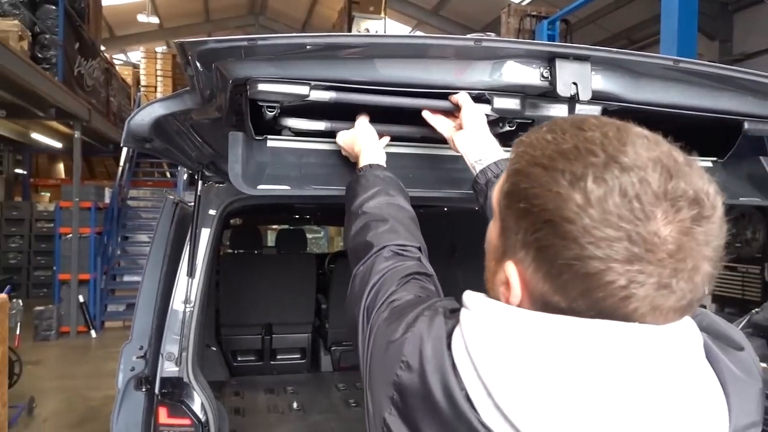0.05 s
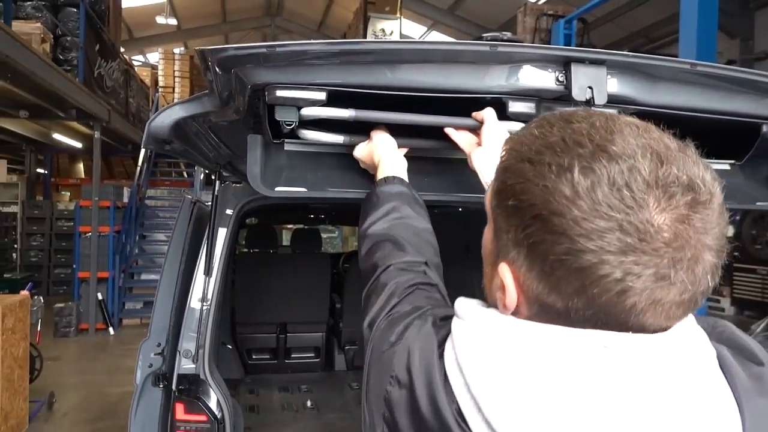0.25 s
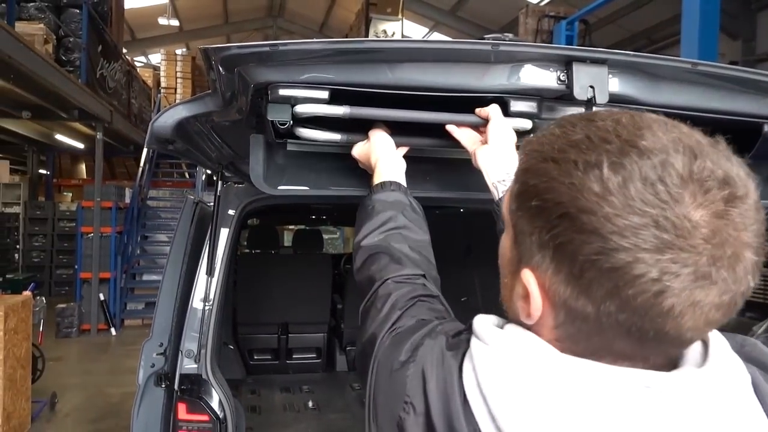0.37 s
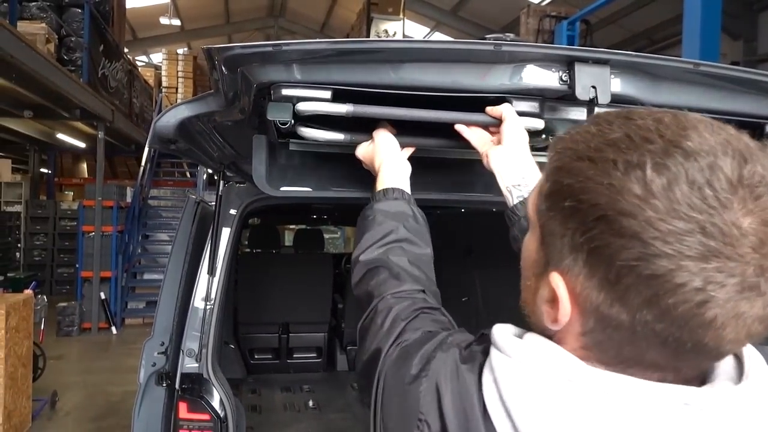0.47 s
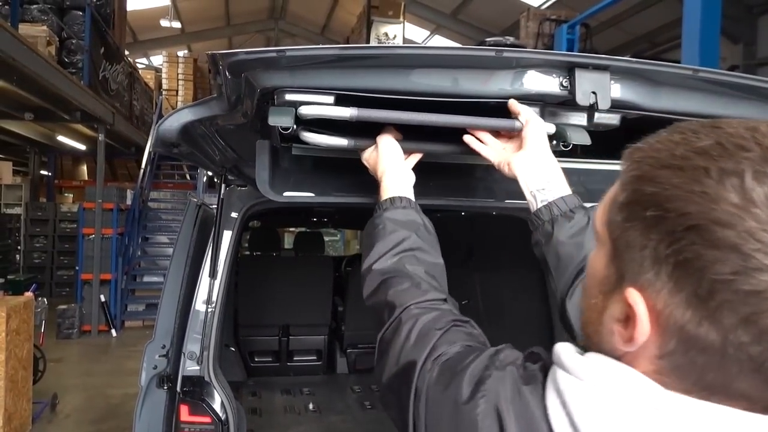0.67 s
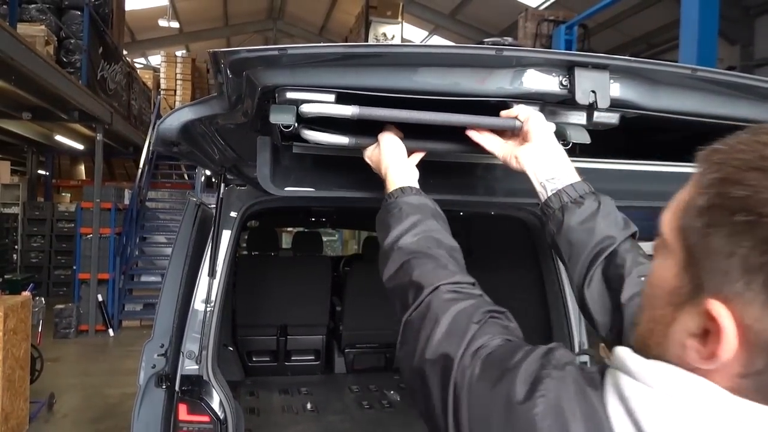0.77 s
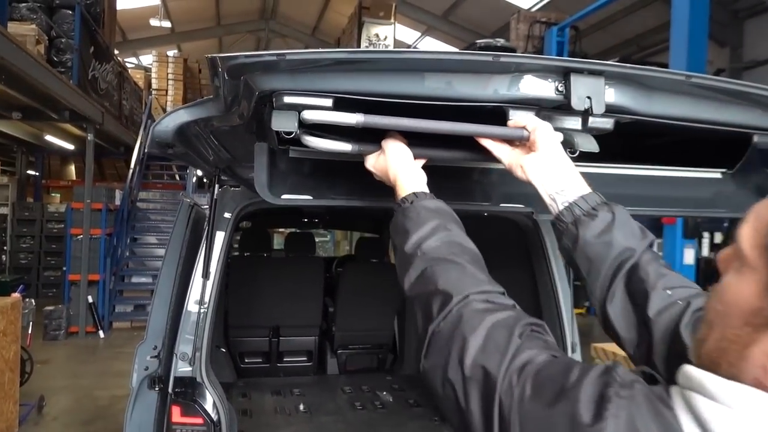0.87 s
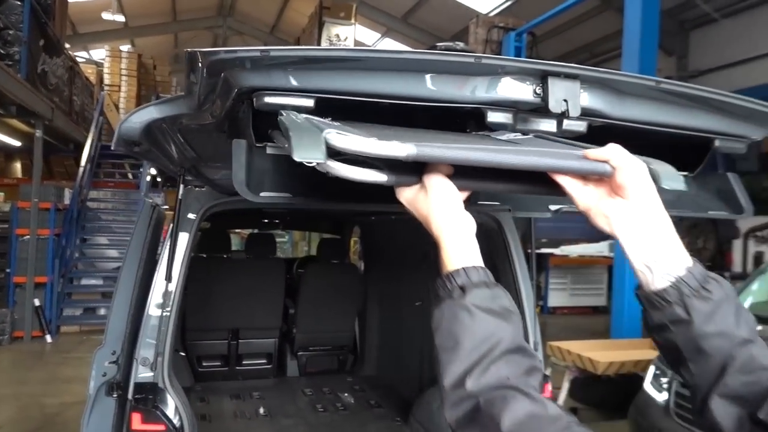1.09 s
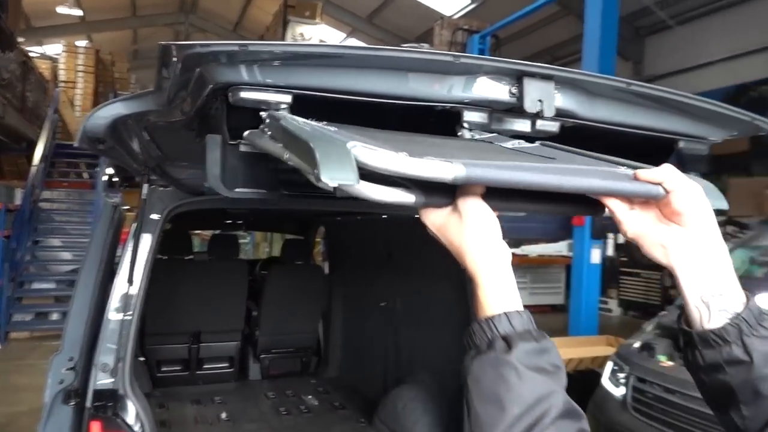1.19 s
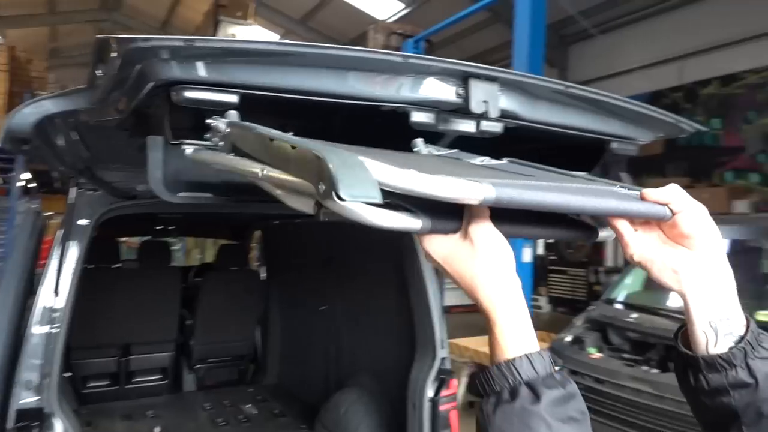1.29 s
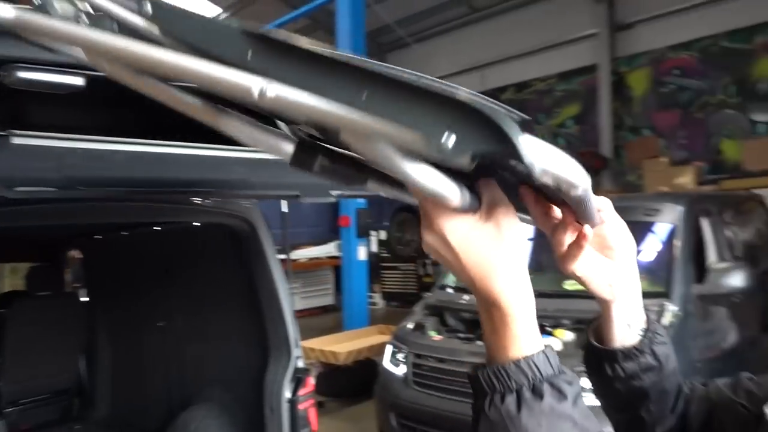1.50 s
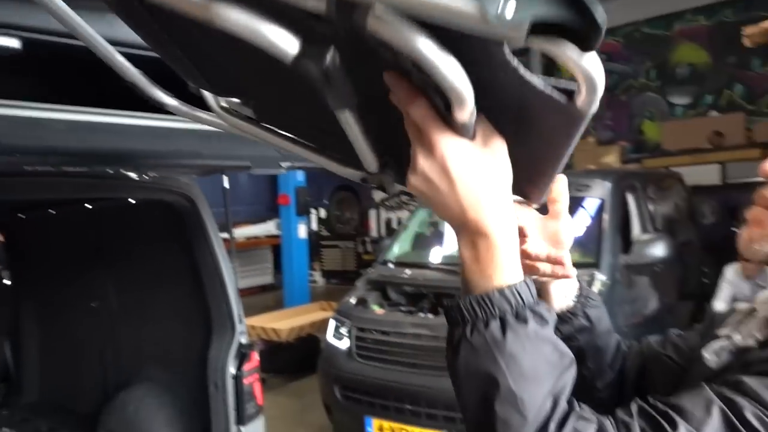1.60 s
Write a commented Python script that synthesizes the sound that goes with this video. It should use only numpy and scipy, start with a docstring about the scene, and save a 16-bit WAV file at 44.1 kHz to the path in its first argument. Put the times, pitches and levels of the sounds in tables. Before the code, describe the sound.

Close, hollow clunks and scrapes come from a folding chair being tugged out of a plastic tailgate compartment. Two groaning pulls lead to a rumbling drag, brief squeaks and a clank, then faint sleeve rustle in a quiet, slightly echoing workshop.

```python
"""A folded camping chair is worked out of a plastic pod on a van's raised tailgate, in a quiet workshop.
First the seat fabric hisses, the chair knocks loose, fittings tick and the tailgate booms from the shove.
Stick-slip friction then makes the pod judder in two pulls, with a nudge and a swish of sleeves between.
Next the tube frame drags over the pod's lip, squeaks and clanks as it comes free.
Last come a very faint, thin whistle and a rustle of sleeves, while the hall's reverberation dies away."""
import sys
import numpy as np
from scipy import signal
from scipy.io import wavfile
from scipy.ndimage import uniform_filter1d

SR = 44100
rng = np.random.default_rng(int(sys.argv[2]) if len(sys.argv) > 2 else 0)


def persist_wave(psi):
    """Save psi, clipped to +-1, as 16-bit WAV."""
    counts = np.round(np.clip(psi, -1, 1) * 32767).astype(np.int16)
    wavfile.write(sys.argv[1], SR, np.atleast_2d(counts).T)


N = 72765
T = np.arange(N) / SR
EDGES = np.geomspace(24, 17000, 23)  # band edges [Hz]
CENTRES = np.sqrt(EDGES[1:] * EDGES[:-1])


def from_db(db):
    """Amplitude grows tenfold for every 20 dB."""
    return 10 ** (np.asarray(db) / 20)


def rms_one(x):
    """Division by the RMS value gives unit power."""
    return x / np.sqrt(np.mean(x ** 2) + 1e-20)


def at_hz(points, hz, column=1):
    """Interpolation of a table column on a log-frequency axis."""
    points = np.array(points)
    return np.interp(np.log(hz), np.log(points[:, 0]), points[:, column])


def level(points, fade_s=0.014):
    """Amplitude envelope along a decibel curve, fading to silence outside it."""
    s, db = np.transpose(points)
    gate = np.interp(T, [s[0] - fade_s, s[0], s[-1], s[-1] + fade_s], [0, 1, 1, 0])
    return from_db(np.interp(T, s, db)) * gate


def bands(pair):
    """A filter bank splits two uncorrelated signals into alternating bands of unit power."""
    filters = [signal.butter(2, edges, "band", fs=SR, output="sos") for edges in zip(EDGES, EDGES[1:])]
    return np.array([rms_one(signal.sosfilt(sos, pair[k % 2])[-N:]) for k, sos in enumerate(filters)])


def noise_bands():
    """Band-limited Gaussian noise, one row a band."""
    return bands(rng.standard_normal((2, N + SR // 4)))


def band_gains(spectrum):
    """Band power is spectral density times bandwidth; the gains give unit total power."""
    gains = from_db(at_hz(spectrum, CENTRES)) * np.sqrt(np.diff(EDGES))
    return gains / np.linalg.norm(gains)


def clicks_at(s, gains):
    """Ideal impacts: impulses one sample long."""
    return np.bincount((np.abs(s) * SR).astype(int), gains, N)[:N]


def ring(clicks, hz, t60):
    """A damped mode answers each impulse with a decaying sine of that height."""
    r, w = from_db(-60 / (max(t60, 1e-3) * SR)), 2 * np.pi * hz / SR
    return signal.lfilter([0, np.sin(w)], [1, -2 * r * np.cos(w), r * r], clicks + 1e-18)


def dying(power, t60):
    """Stored energy decays exponentially after each impulse."""
    return signal.lfilter([1], [1, -np.exp(-2 * np.log(1000) / (t60 * SR))], power + 1e-18)


def resonate(x, hz, width_hz):
    """A driven resonator with unit gain at its peak."""
    r, w = np.exp(-np.pi * width_hz / SR), 2 * np.pi * hz / SR
    return signal.lfilter(np.array([1, 0, -1]) * (1 - r * r) / 2, [1, -2 * r * np.cos(w), r * r], x + 1e-18)


def gliding(x, hz, width_hz):
    """A driven resonator with a moving natural frequency and unit peak gain."""
    turn = np.exp(2j * np.pi * np.cumsum(hz) / SR)
    r = np.exp(-np.pi * width_hz / SR)
    return 2 * np.real(turn * signal.lfilter([1 - r], [1, -r], x / turn + 1e-18))


def wobble(size):
    """Noise averaged twice over `size` samples fluctuates smoothly, with unit power."""
    return rms_one(uniform_filter1d(uniform_filter1d(rng.standard_normal(N), size), size))


def air():
    """Ambient noise: the workshop's steady background, strongest in the bass."""
    # (frequency [Hz], relative spectral density [dB])
    spectrum = [(30, -0.5), (60, -7), (105, -1), (180, -12.5), (420, -10.5), (900, -22), (2000, -27.5),
                (4500, -38.5), (9000, -41), (15000, -50)]
    return from_db(-50.5) * (band_gains(spectrum) @ noise_bands())


def tailgate():
    """Panel vibration: two low modes of the thin tailgate skin swell and decay after each shove."""
    # shoves: (time [s], peak level [dB])
    booms = [(.01, -50), (0.314, -20.5), (0.491, -35), (.655, -39), (1.11, -27.5), (1.335, -33)]
    swell_s, fall_s = 0.049, 0.045
    mode_hz, overtone_hz, overtone_db = 106.7, 154.6, -24
    envelope = 0
    for s, db in booms:
        age = np.maximum(T - s, 0)
        swell = (1 - np.exp(-(age / swell_s) ** 2)) * np.exp(-age / fall_s)
        envelope += from_db(db) * swell / swell.max()
    overtone = from_db(overtone_db) * np.sin(2 * np.pi * overtone_hz * T)
    return envelope * (np.sin(2 * np.pi * mode_hz * T) + overtone)


def cloth(spectrum, rough_db):
    """Friction noise of woven threads; random amplitude modulation gives it a fine grain."""
    grain = rms_one(uniform_filter1d(rng.standard_normal(N), size=90))
    return rms_one((band_gains(spectrum) @ noise_bands()) * from_db(rough_db * grain))


def seat():
    """Sliding friction: the seat fabric hisses over the pod."""
    # envelope of the slide: (time [s], level [dB])
    slide = [(.2, -57.5), (.48, -48), (.52, -39.5), (.66, -48), (.89, -51), (.95, -40), (1.04, -34.5),
             (1.13, -32), (1.2, -39.5), (1.27, -47), (1.48, -51)]
    # hiss: (frequency [Hz], relative spectral density [dB])
    spectrum = [(400, 5), (900, 6), (1500, 2.5), (2200, 0.5), (3200, -12.5), (4800, -17.5), (8000, -22.5),
                (11000, -38), (15000, -35)]
    return level(slide) * cloth(spectrum, rough_db=1.0)


def knocks():
    """Impact excitation: a knock cracks and rings the pod's dense modes, the struck spot and the frame."""
    # chair on pod: (time [s], level [dB], bass offset [dB], treble offset [dB], frame offset [dB],
    # note of the struck spot [Hz], note offset [dB])
    impacts = [(0.213, -41, 3, -18, -22, 330, 0), (0.2234, -30, 0, -27, -12, 475, 8),
               (0.26, -28, -2, -29, -26, 244, 7.5), (0.266, -30, 8, -1.5, -17, 373, 6.5),
               (0.290, -17, -6, 0, -24, 760, -4), (0.298, -23, 7, -30, -3, 466, 11),
               (0.315, -22, 11, -6, -27, 251, 5.5), (0.3235, -26, 0, 12.5, -3, 450, 1),
               (0.331, -20, -6, 1.5, -21, 422, 9), (0.352, -26, 6, 4.5, -5, 380, 7),
               (0.364, -17.5, -7, -15, -22, 295, 6.5), (0.383, -26, -5, -20, -14, 401, 8),
               (0.398, -29.5, 2, -8, -16, 680, 1.5), (0.417, -30, 0, -7, -10, 484, 3),
               (0.466, -38, 7, -14, -8, 349, 11), (0.499, -43.5, 11, 17, -4.5, 473, 2),
               (0.517, -29, 13, -6, -18, 594, 7), (0.642, -37.5, -11, -22, -3, 354, 14),
               (0.897, -33, 3.5, -11, -13, 423, 4), (1.072, -23.5, 4.5, -37, -7, 368, 4.5),
               (1.1425, -19, 2, -19, -5, 151, 0), (1.174, -31.5, 19, -22, -22, 160, 10),
               (1.19, -29.5, 13, -10, -22, 292, 8.5), (1.2093, -18, 3, -6, -2.5, 216, -2),
               (1.218, -23, 3, -23, -15, 162, 8.5), (1.227, -31, 13, -13, 1, 536, 3),
               (1.2746, -19.5, -20, 9, -19, 1314, 3), (1.28, -19.5, 3, 6, -3, 1158, 10),
               (1.286, -25, -10, 9.5, -5, 564, 4), (1.302, -23.5, 0, -28, -2, 649, 5),
               (1.32, -26, -6, -7, -7, 415.5, 8)]
    # the pod's dense modes: (frequency [Hz], relative spectral density [dB])
    pod_spectrum = [(35, -15), (70, -25.5), (140, -3), (330, -0.5), (650, 0), (1050, -6), (1600, -14),
                    (2700, -20.5), (4200, -38.5), (7500, -44), (15000, -51)]
    # their damping: (frequency [Hz], t60 [s])
    pod_t60 = [(60, 0.29), (350, 0.22), (1500, 0.16), (5000, 0.14), (14000, 0.036)]
    # attack, slower in the bass: (frequency [Hz], rise time [s])
    rise_times = [(100, 0.0059), (1000, 0.0011), (6000, 0.0008)]
    # modes of the tube frame: (frequency [Hz], relative level [dB], t60 [s])
    frame_modes = [(347.8, -7.5, 0.33), (467.4, -2.5, 0.43), (678, 2.5, 0.071), (964, -4, 0.18),
                   (1135, -8, 0.094), (1252, -1, 0.11), (1426, -3, 0.12), (1944, -6.5, 0.055),
                   (2277, -13, 0.19), (2410, -23, 0.11)]
    bass_hz, middle_hz, treble_hz = 120, 520, 3700
    crack_db, crack_t60_s, frame_db = 4.5, 0.017, -4.5
    s, db, bass_db, treble_db, ring_db, note_hz, note_db = np.transpose(impacts)
    out = 0
    for hz, noise, gain in zip(CENTRES, noise_bands(), band_gains(pod_spectrum)):
        bass = at_hz([(bass_hz, 1), (middle_hz, 0)], hz)
        treble = at_hz([(middle_hz, 0), (treble_hz, 1)], hz)
        blows = clicks_at(s, from_db(db + bass * bass_db + treble * treble_db) ** 2)
        crack = from_db(crack_db) ** 2 * dying(blows, crack_t60_s)
        power = dying(blows, at_hz(pod_t60, hz)) + crack
        rise = np.exp(-1 / (at_hz(rise_times, hz) * SR))
        out += gain * noise * np.sqrt(signal.lfilter([1 - rise], [1, -rise], power))
    for start, hit_db, hz in zip(s, db + note_db, note_hz):
        out += ring(clicks_at([start], [from_db(hit_db)]), hz, t60=0.086)
    for hz, mode_db, t60 in frame_modes:
        strengths = from_db(frame_db + db + ring_db + mode_db + rng.normal(0, 1.5, len(s)))
        out += ring(clicks_at(s, strengths), hz, t60) * rng.choice([-1, 1])
    return out


def ticks():
    """Resonant filtering: each brief scratch excites one broad resonance of a small hard fitting."""
    # (time [s], level [dB], resonance [Hz])
    scratches = [(.224, -56, 6450), (0.258, -50, 5400), (0.264, -54, 8000), (0.295, -39, 7900),
                 (0.3206, -44, 6200), (0.328, -42, 5500), (0.351, -43.5, 6100), (.399, -55.5, 10900),
                 (0.498, -52, 5540), (.897, -48, 905), (0.896, -58.5, 1990), (1.163, -51.5, 7600),
                 (1.21, -43.5, 6730), (1.279, -31, 4480)]
    width_hz, t60_s = 800, 0.046
    make_up = np.sqrt(SR / (np.pi * width_hz))  # restores the power lost in filtering
    out = 0
    for s, db, hz in scratches:
        envelope = (T >= s) * from_db(-60 * np.clip((T - s) / t60_s, 0, 3))
        out += from_db(db) * make_up * resonate(rng.standard_normal(N) * envelope, hz, width_hz)
    return out


def stick_slip(force, spot):
    """Stick-slip friction: uneven slips and grit drive the pod wall into a hollow, rising groan."""
    slips_per_s, jitter, spread_db, grit = 180, 0.42, 3, 0.64
    flat_share, settle_s, handover_db_per_s, dull_hz = 0.13, 0.017, 172, 1710
    gap_draws, size_draws = rng.standard_normal((900, 2)).T
    slip_times = np.cumsum(np.exp(jitter * gap_draws)) / slips_per_s
    slips = clicks_at(slip_times, from_db(spread_db * np.tanh(size_draws)))
    drive = rms_one(rms_one(slips) + grit * rng.standard_normal(N)) * level(force)
    # the resonances start flat and rise as the contact is loaded
    bend = 1 - flat_share * np.exp(-np.maximum(T - force[0][0], 0) / settle_s)
    hz, width, db, peak_s = np.transpose(spot)
    # each fades as the contact slides away from it; together they keep the drive's power
    shares = from_db(db[:, None] - handover_db_per_s * np.abs(T - peak_s[:, None]))
    shares /= np.sqrt(np.pi * width / SR @ shares ** 2)
    wall = sum((-1) ** k * gliding(drive * share, hz[k] * bend, width[k])
               for k, share in enumerate(shares))
    return signal.sosfilt(signal.butter(2, dull_hz, fs=SR, output="sos"), wall)


def judders():
    """The contact point selects the modes: two pulls and a nudge between each rub a different spot."""
    # friction force: (time [s], level [dB])
    first_pull = [(.51, -21.5), (.522, -18), (.565, -18), (.585, -24), (.60, -19.5), (.638, -26.5),
                  (.655, -43)]
    nudge = [(.80, -41), (.82, -46)]
    second_pull = [(.9, -36.5), (.92, -23.5), (.94, -19), (.956, -15.5), (.968, -29), (.985, -40)]
    # wall resonances: (frequency [Hz], bandwidth [Hz], weight [dB], time of greatest weight [s])
    first_spot = [(303, 27.6, -4, 0.609), (477.2, 20.8, 3, 0.602), (491, 45, 3, 0.526),
                  (546, 58, 0.5, 0.587), (633, 47, 3, 0.522), (677.4, 31, -2.5, .6), (860, 80, -7, .585),
                  (970, 80, -8, .535), (1380, 85, -18.5, 0.595)]
    nudge_spot = [(569, 40, 6, .803), (1100, 630, -5, .815)]
    second_spot = [(327, 42, -1, 0.89), (459, 36, -2, .92), (576, 55, -1, .94), (669, 50, 5, .968),
                   (912, 120, -3, 0.93), (1220, 55, -4, .938), (1350, 60, -11, 0.93)]
    return (stick_slip(first_pull, first_spot) + stick_slip(nudge, nudge_spot)
            + stick_slip(second_pull, second_spot))


def squeaks_and_whistle():
    """Friction-induced oscillation: the tube chirps on the plastic five times.
    Later a very faint, thin 8 kHz whistle sounds."""
    # rough, slightly rising tones: (time [s], duration [s], level [dB], frequency [Hz])
    tones = [(0.831, 0.015, -50, 2800), (1.072, 0.025, -41, 2756), (1.155, 0.019, -28.5, 1422),
             (1.186, .027, -26.5, 1407), (1.212, 0.024, -26, 1500), (1.422, .09, -72, 8100)]
    rise_hz_per_s, waver_hz, rough_db = 970, 24.27, 7
    out = 0
    for s, length, db, hz in tones:
        progress = np.clip((T - s) / length, 0, 1)
        pitch = hz + rise_hz_per_s * length * (progress - 0.5) + waver_hz * wobble(size=150)
        roughness = from_db(rough_db * np.tanh(wobble(size=110)))
        tone = rms_one(np.sin(2 * np.pi * np.cumsum(pitch) / SR) * roughness)
        envelope = from_db(db) * np.sqrt(np.abs(np.sin(np.pi * progress)))
        out += resonate(envelope * tone, hz, width_hz=440)
    return out


def drag():
    """Shot noise: dense little catches rumble through the pod as the frame slides over its lip."""
    # envelope of the slide: (time [s], level [dB])
    slide = [(.97, -32), (1.01, -29.5), (1.06, -30.5), (1.10, -29.5), (1.15, -25.5), (1.22, -25),
             (1.25, -31), (1.275, -41.5)]
    # rumble: (frequency [Hz], relative spectral density [dB])
    spectrum = [(30, -26), (60, -22.5), (130, 2), (250, -1.5), (520, 8), (750, -1), (1050, -8),
                (1500, -5.5), (2500, -44), (5000, -71)]
    catches_per_s = 590
    catches = (rng.random((2, N)) < catches_per_s / SR) * rng.choice([-1, 1], (2, N))
    strengths = from_db(np.minimum(rng.exponential(1, (2, N)), 4))
    return level(slide) * (band_gains(spectrum) @ bands(catches * strengths + 1e-18))


def sleeves():
    """Friction noise: the jacket sleeves swish in bell-shaped swells."""
    # (time of peak [s], half duration [s], level [dB])
    swishes = [(0.77, 0.097, -57), (0.848, 0.02, -65.5), (1.539, 0.029, -50.5), (1.59, 0.11, -58.5)]
    # rustle: (frequency [Hz], relative spectral density [dB])
    spectrum = [(1000, 2), (2200, -2), (3600, 1), (5500, -8.5), (8000, -12.5), (15000, -26)]
    envelope = sum(from_db(db) / (1 + ((T - s) / half) ** 4) for s, half, db in swishes)
    return envelope * cloth(spectrum, rough_db=1.7)


def hall(x):
    """Reverberation: a diffuse field builds up, then decays exponentially at each band's own rate."""
    # (frequency [Hz], reverberant level [dB], t60 [s])
    reverb = [(59, 2, 0.67), (197, -13.5, 0.38), (497, -13, 0.61), (1450, -17, 0.74), (4030, -11.5, 0.71),
              (12000, -9.5, 0.17)]
    build_s = 0.016
    t60 = at_hz(reverb, CENTRES, column=2)[:, None]
    tails = noise_bands() * np.exp(-np.log(1000) * T / t60) * (1 - np.exp(-T / build_s))
    gains = from_db(at_hz(reverb, CENTRES)) * np.sqrt(2 * np.diff(EDGES) / SR)
    gains /= np.linalg.norm(tails, axis=1)
    return signal.fftconvolve(x, gains @ tails)[:N]


def scene():
    """Superposition of the direct sounds, their reverberation, the tailgate and the air, in mono."""
    direct = knocks() + judders() + drag() + squeaks_and_whistle() + seat() + sleeves() + ticks()
    return (direct + hall(direct) + tailgate() + air())[None]


def record(dry):
    """Band limiting: the microphone sheds the lowest rumble, and a steep low-pass cuts the top."""
    low_cut_hz, high_cut_hz = 44, 15850
    dry = signal.sosfilt(signal.butter(2, low_cut_hz, "high", fs=SR, output="sos"), dry)
    return signal.sosfilt(signal.ellip(12, 0.1, 80, high_cut_hz, fs=SR, output="sos"), dry)


dry = scene()
out = record(dry)
persist_wave(out)
```